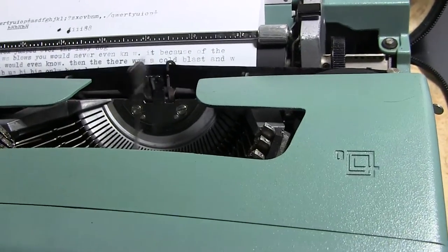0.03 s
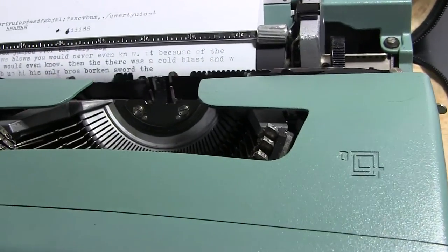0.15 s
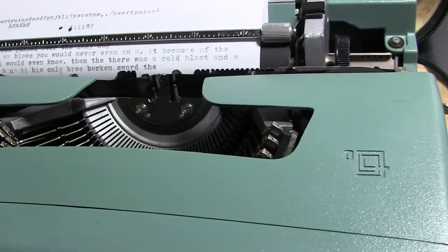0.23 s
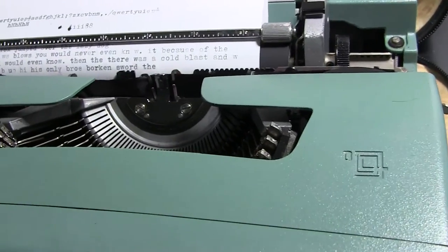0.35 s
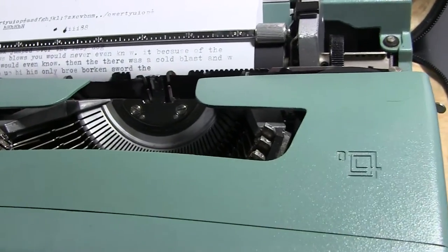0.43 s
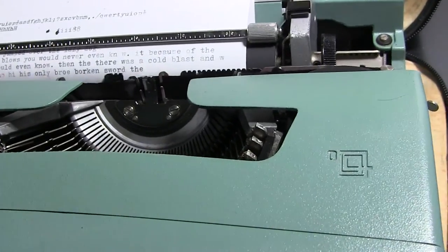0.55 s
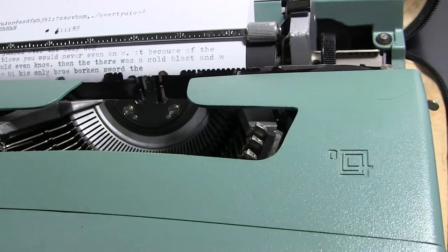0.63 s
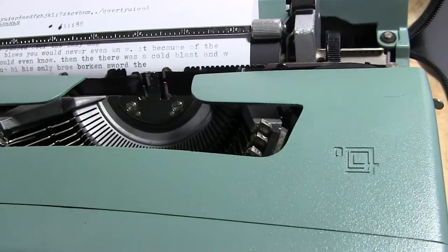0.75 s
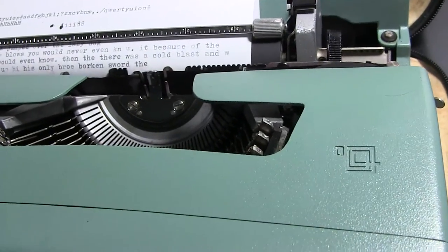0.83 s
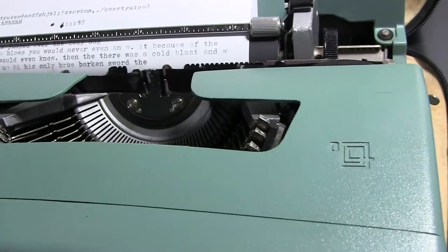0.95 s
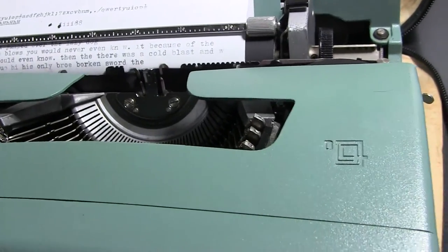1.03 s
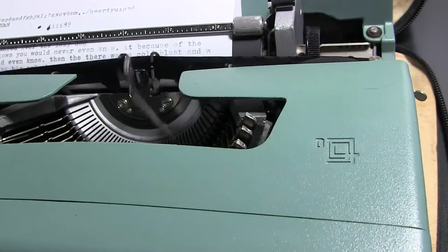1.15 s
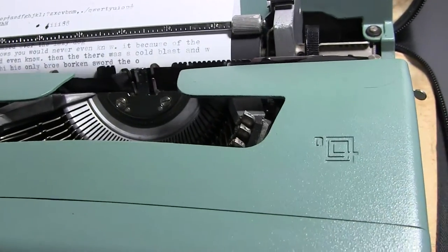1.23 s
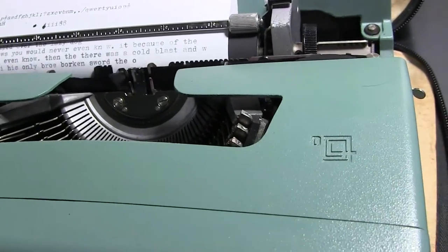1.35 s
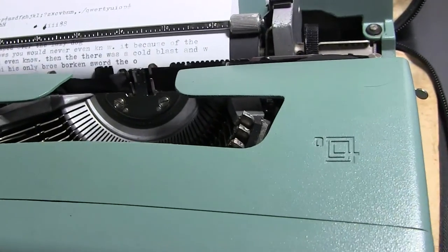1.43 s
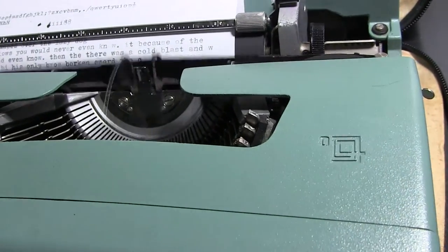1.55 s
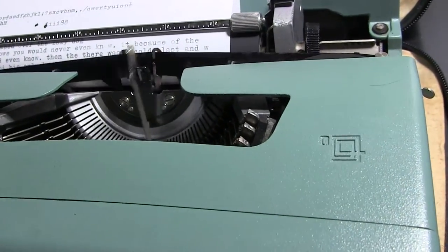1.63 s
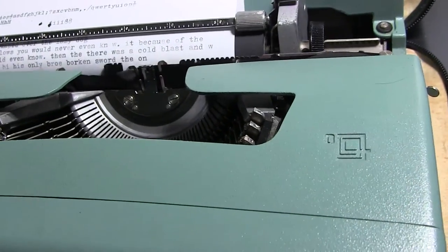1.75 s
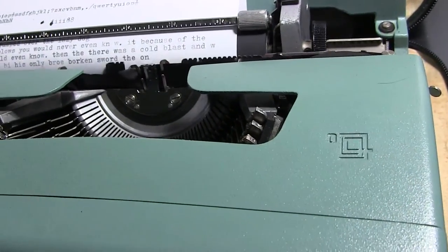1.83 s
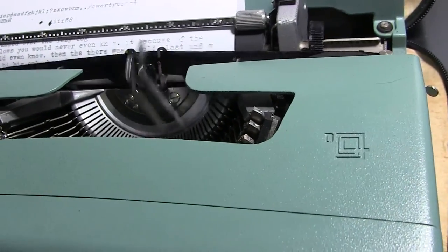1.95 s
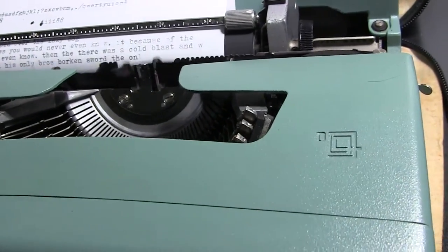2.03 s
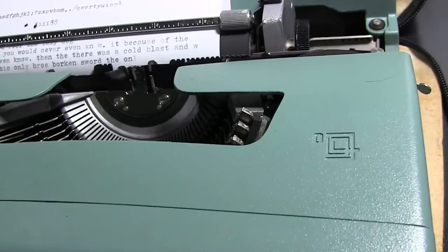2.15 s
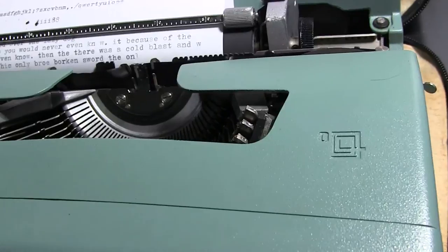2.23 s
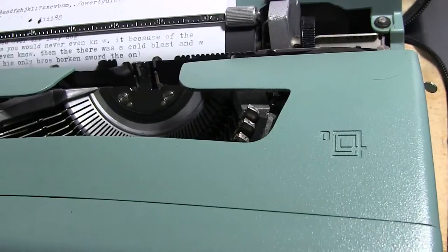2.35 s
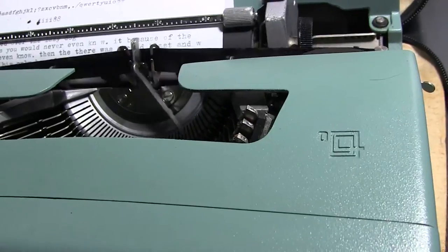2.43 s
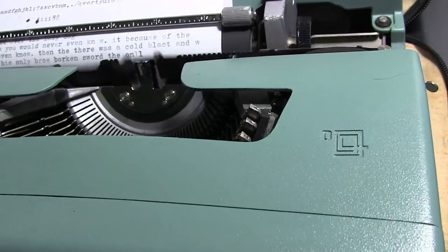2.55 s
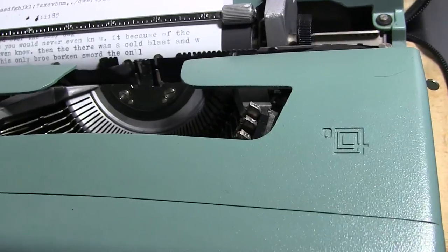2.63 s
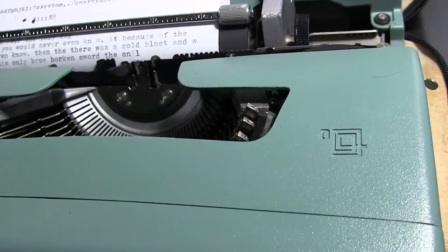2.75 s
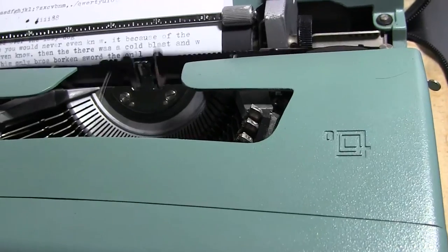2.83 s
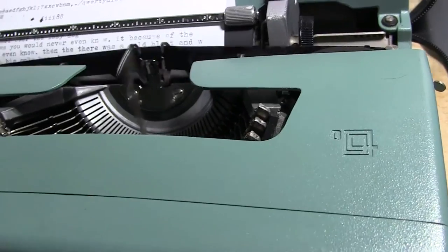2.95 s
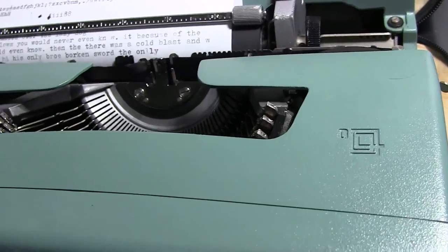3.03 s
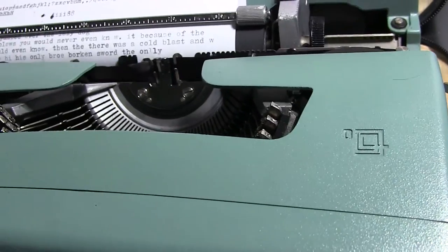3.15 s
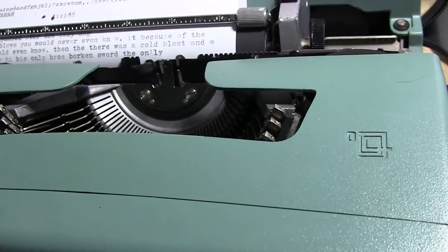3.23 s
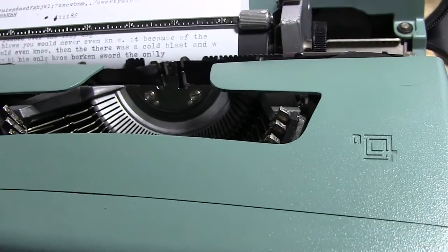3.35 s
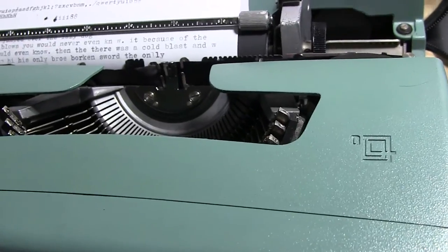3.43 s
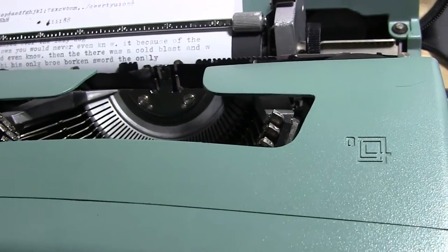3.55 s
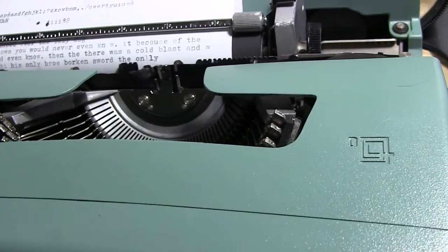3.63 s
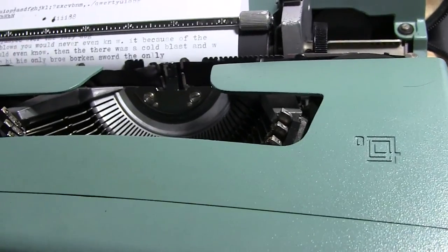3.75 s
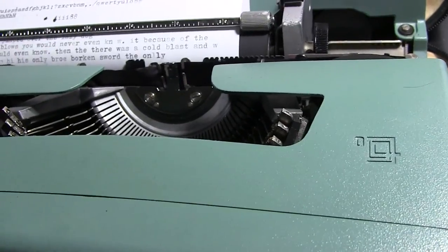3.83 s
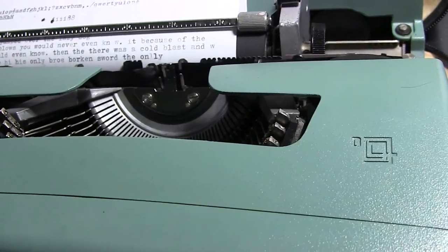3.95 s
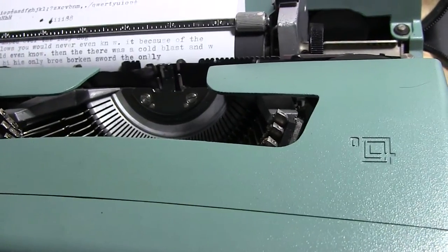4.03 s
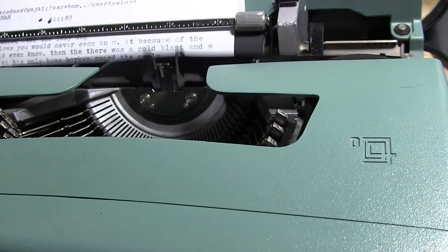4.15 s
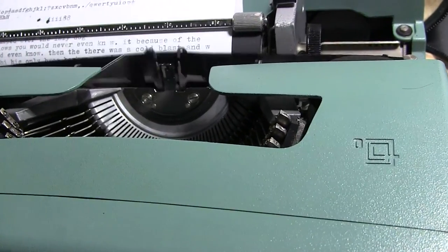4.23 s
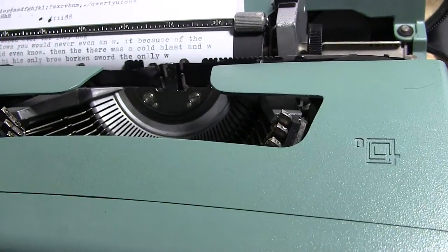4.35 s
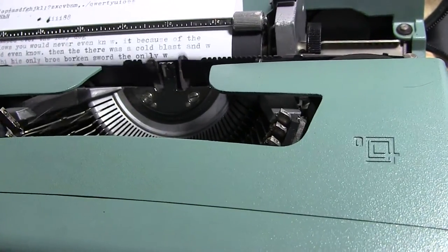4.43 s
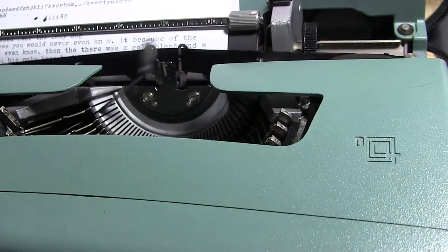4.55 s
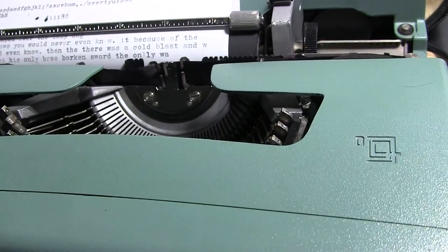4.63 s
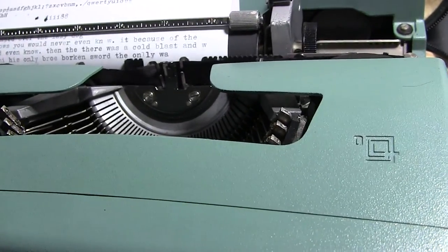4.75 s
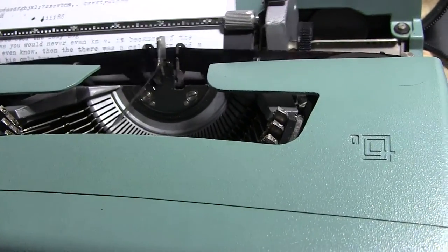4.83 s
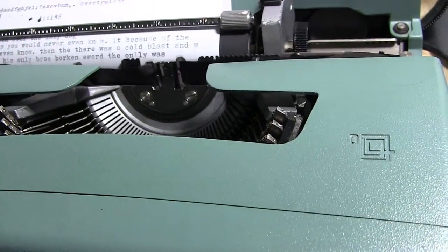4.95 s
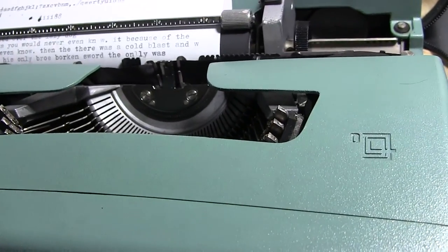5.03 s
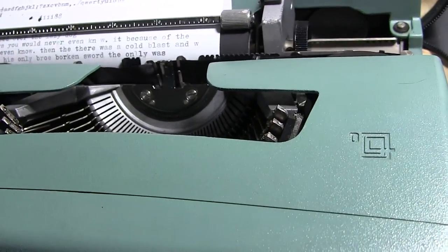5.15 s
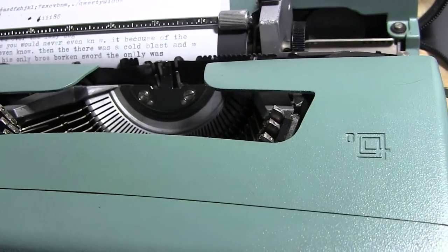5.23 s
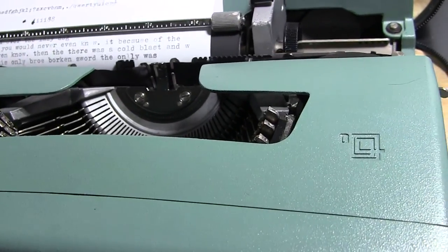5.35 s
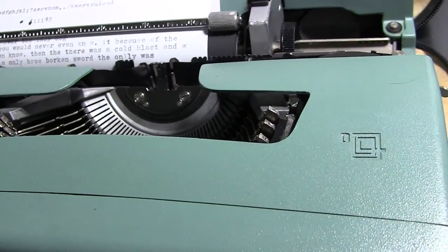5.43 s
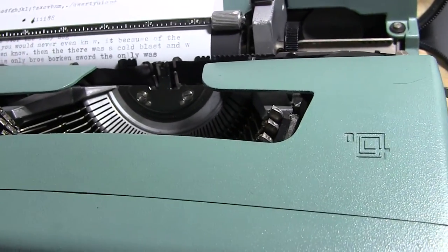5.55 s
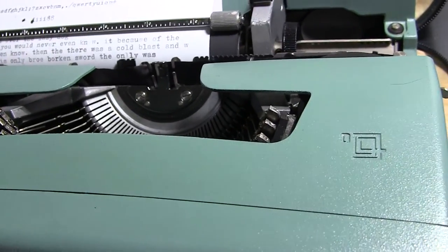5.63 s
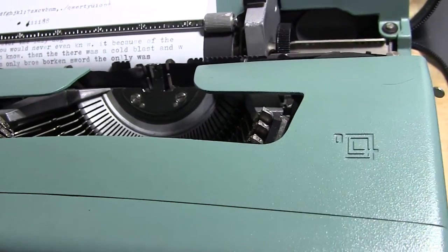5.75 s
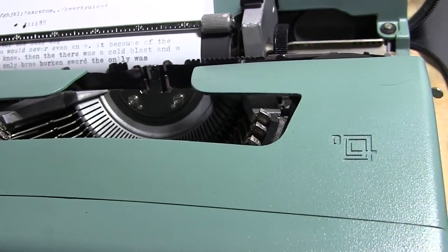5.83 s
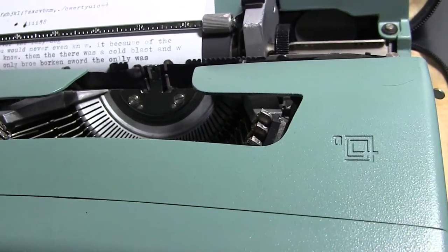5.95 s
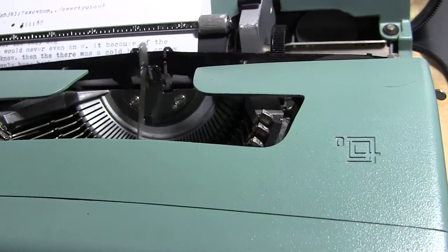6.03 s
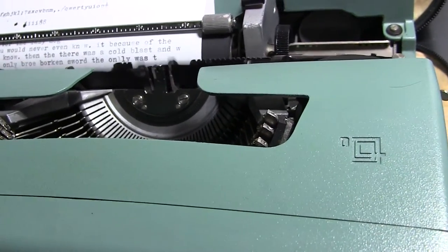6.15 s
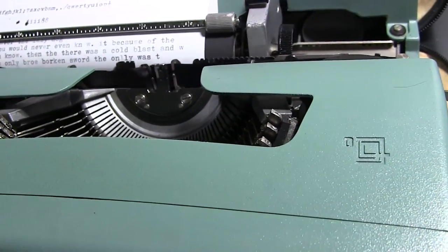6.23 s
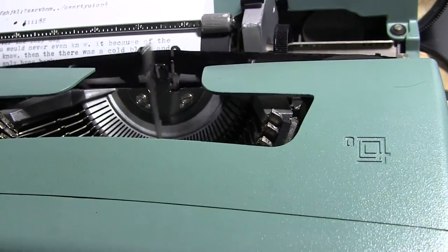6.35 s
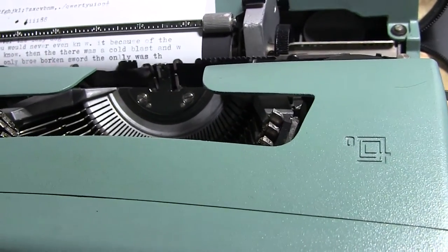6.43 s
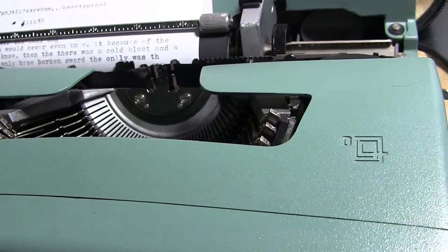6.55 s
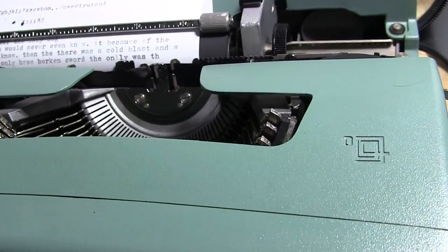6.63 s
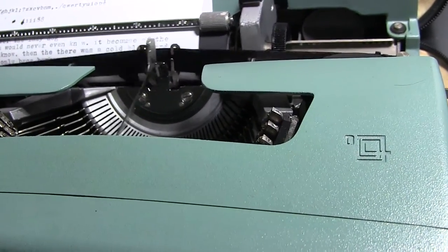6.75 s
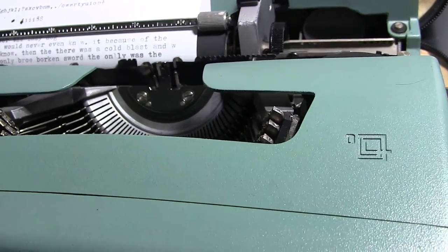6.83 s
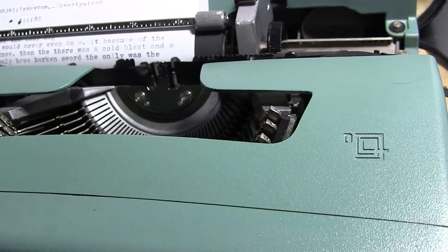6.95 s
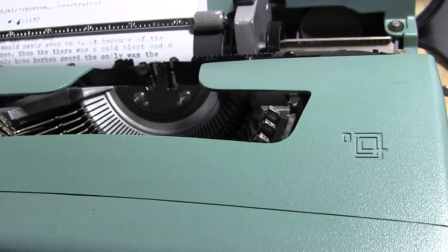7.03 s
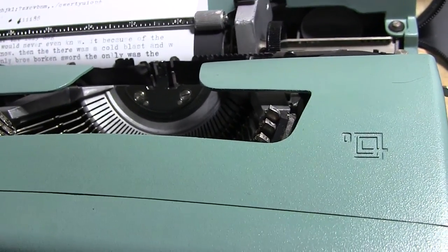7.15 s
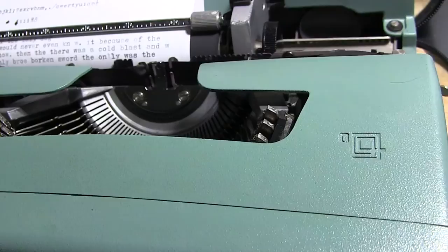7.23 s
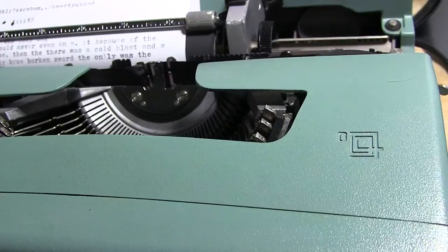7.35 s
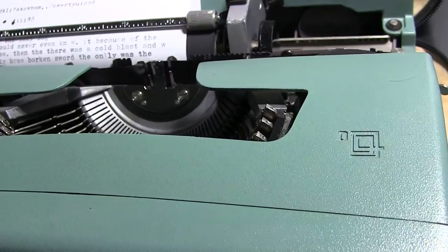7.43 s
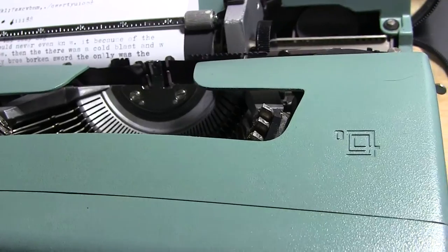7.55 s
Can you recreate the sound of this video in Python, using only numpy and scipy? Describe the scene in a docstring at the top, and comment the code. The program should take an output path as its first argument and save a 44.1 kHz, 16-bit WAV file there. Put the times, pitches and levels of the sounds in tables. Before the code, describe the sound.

Close up, a manual typewriter types a few short words in sharp metallic slaps, with carriage thuds, typebar clacks and hollow space bar knocks between.

```python
"""Manual typewriter in a small room

Close by on a desk, a few words are typed with pauses between them. Each letter is a chain of contacts: the
key takes up its linkage, the type slaps the platen, the carriage steps and stops, the typebar drops on its rest.
The space bar knocks down and rattles up. Every blow is a single push plus noisy chatter through the resonances
of the struck part, with a diffuse tail; damped modes of typebars, case and frame and spring noise ring on.
A quiet, wide room tone lies beneath."""
import sys
import numpy as np
from scipy import signal
from scipy.fft import rfft, irfft, next_fast_len
from scipy.io import wavfile

SR = 44100
rng = np.random.default_rng(int(sys.argv[2]) if len(sys.argv) > 2 else 0)


def file_out(sig):
    """Save sig as 16-bit WAV at sys.argv[1]."""
    # one column per channel
    cols = np.atleast_2d(sig).T
    # limit, then scale
    lim = np.clip(cols, -1, 1)
    pcm = np.round(lim * 32767).astype(np.int16)
    wavfile.write(sys.argv[1], SR, pcm)


N = 335160  # samples in the scene

# type slaps the platen: (time [s], level [dB], typebar ring [dB], time the finger holds the carriage back [s])
STRIKES = [(1.2248, -12.5, -53, 0), (1.7296, -12, -46, 0.002), (2.0633, -18.5, -35, 0),
           (2.5644, -12, -41.5, .038), (3.0017, -12.5, -45.5, 0.004), (4.293, -10.5, -20, 0.041),
           (4.6098, -11, -18, 0.00034), (4.956, -10, -26.5, .051), (6.1319, -11, -39, 0.0031),
           (6.4296, -12, -39, 0.0032), (6.8582, -11.3, -43, 0.0014)]
# a key takes up the slack of its linkage: (time [s], level [dB])
KEYS = [(0.064, -33.5), (.092, -38), (1.157, -43.5), (1.6794, -33.5), (1.988, -33.5), (2.037, -32.5),
        (2.5277, -26), (2.9549, -27.5), (4.258, -39.5), (4.563, -32), (4.9162, -28), (6.074, -41.5),
        (6.3869, -29), (6.811, -29.5)]
# resonances of the struck platen: (frequency [Hz], width [Hz], level [dB])
PLATEN = [(208, 71, 1.5), (333, 18, -18.5), (724, 400, -7), (1310, 860, -9), (1750, 128, -7.5),
          (2560, 560, 1.5), (3220, 260, -5), (3880, 93, -4.5), (4080, 430, -3), (5330, 110, -3.5),
          (6170, 430, -2.5), (7360, 403, -9), (8700, 450, -11.5), (10170, 480, -7.5), (11500, 2300, -13.5)]
# resonances of the key linkage: (frequency [Hz], width [Hz], level [dB])
LINKAGE = [(121, 120, -0.5), (228, 37, 1.5), (323, 37, -5), (736, 180, -9.5), (1129, 440, -6.5),
           (1488, 340, -9.5), (2370, 204, -11.5), (3525, 300, -11.5), (5594, 1038, -19), (9300, 3700, -24)]
# modes of a typebar after its slap: (frequency [Hz], level [dB], t60 [s])
TYPEBAR = [(4400, -8, .27), (5862, -14, .2), (6697, -10, .09), (8440, -15, .18), (10590, -11, .2),
           (11950, -.5, .13)]
# colour of the springs' sizzle after a slap: (frequency [Hz], relative density [dB per Hz])
SPRINGS = [(150, -16), (300, -5.5), (700, -4), (1300, 1), (2700, 0), (5000, 0.5), (7500, 1.5),
           (10000, -8.5), (12500, -13.5), (15000, -32)]
FIRM_SLAP_DB, SLAP_BRIGHTENS = -12.5, 1.6  # a firm slap; dB more treble for each dB harder
FIRM_KEY_DB, KEY_BRIGHTENS = -28, .5  # a firm press; dB more treble for each dB harder
CLASH_S, CLASH_DB = 2.0933, -20.5  # two typebars rise together once and clash at the guide


def letters(trip_db=-17, trip_ahead_s=.008, spring_db=-18.0, spring_t60=0.43):
    """Impact excitation: key click, escapement trip, slap, then free ringing; harder blows are brighter."""
    out, t = np.zeros(N), np.arange(SR) / SR
    for s, db in KEYS:
        bright_db = KEY_BRIGHTENS * (db - FIRM_KEY_DB)
        click = contact(LINKAGE, db, bass_db=-0.5, treble_db=5.5 + bright_db, chatter_t60=0.046, rise_s=0.00046,
                        slide_db=-28.5, slide_t60=.03, tail_db=-2.5, grit_db=0.8)
        add(out, s, click, LEAD)
    for s, db, ring_db, _ in STRIKES:
        trip = contact(PLATEN, db + trip_db, bass_db=0, treble_db=-1.8, chatter_t60=.05, rise_s=0.00035,
                       slide_db=-8, slide_t60=0.03, tail_db=-4.5, grit_db=5.5)
        add(out, s - trip_ahead_s, trip, LEAD)
        bright_db = SLAP_BRIGHTENS * (db - FIRM_SLAP_DB)
        slap = contact(PLATEN, db, bass_db=-8, treble_db=3.5 + bright_db, chatter_t60=.024, rise_s=.00015,
                       slide_db=-35.0, slide_t60=.02, tail_db=-13.5, grit_db=1.5)
        add(out, s, slap, LEAD)
        add(out, s, amp(ring_db) * ring(TYPEBAR))
        decay = amp(db + spring_db - 60 * t / spring_t60)
        sizzle = decay * grainy(SR, grit_db=2) * noise(SPRINGS, SR)
        add(out, s + .004, sizzle)
    clash = contact(PLATEN, CLASH_DB, bass_db=0.5, treble_db=15.0, chatter_t60=.045, rise_s=.00015,
                    slide_db=-34.5, slide_t60=.02, tail_db=-22, grit_db=7.5)
    add(out, CLASH_S, clash, LEAD)
    return out


# resonances of the stopped carriage: (frequency [Hz], width [Hz], level [dB])
CARRIAGE = [(96, 18, -5), (122, 44, 3.5), (227.5, 12, 5), (318, 45, -2.5), (446.6, 27, -4), (659, 41, -7.5),
            (787, 65, -4.5), (1118, 66, -6.5), (1420, 490, -18.5), (2600, 310, -12.5), (4100, 320, -15),
            (6500, 3200, -27.5), (9630, 3043, -43.5)]
# colour of the carriage rolling on its rail: (frequency [Hz], gain [dB])
RAIL = [(40, -34.5), (85, -5), (125, 1), (165, -9.5), (220, 0), (520, -13), (760, -1.5), (1150, -5),
        (1800, -9), (2700, -6), (6000, -13), (11000, -29), (15000, -46)]
LETTER_STEP_S = .0515  # from a slap until the carriage stops, without any holding back
LETTER_STOP_DB, SPACE_STOP_DB = -21, -21.5  # thud after a letter and after a space


def carriage(frame_db=-23, roll_db=-29, let_go_s=.035):
    """Rolling contact excites noise with the speed as envelope; the stop at the escapement is an impact."""
    out, t = np.zeros(N), np.arange(SR // 2) / SR
    steps = [(s, LETTER_STEP_S + held, LETTER_STOP_DB) for s, _, _, held in STRIKES]
    steps += [(s, wait, SPACE_STOP_DB) for s, _, wait in SPACES]
    for stroke, wait, db in steps:
        start, stop = stroke + min(let_go_s, wait), stroke + wait
        slowing = amp(-60 * np.maximum(t - (stop - start), 0) / .24)
        speed = np.clip(t / .008, 0, 1) * slowing
        bumps = grainy(len(t), 4.5) * rng.standard_normal(len(t))
        roll = filtered(bumps, lambda hz: amp(along(RAIL, hz)))
        add(out, start, amp(roll_db) * speed * roll / rms(roll))
        thud = contact(CARRIAGE, db, bass_db=-5.5, treble_db=-1.0, chatter_t60=.07, rise_s=0.0011,
                       slide_db=-11.0, slide_t60=0.22, tail_db=-9.5, grit_db=2.5)
        add(out, stop, thud, LEAD)
        add(out, stop, amp(db + frame_db) * frame_ring())
    return out


# a typebar falls on its rest: (time [s], level [dB], pitch of that bar [Hz])
RETURNS = [(1.3645, -17.5, 2455), (1.857, -15, 970), (2.181, -16.5, 2510), (2.689, -17, 1110),
           (3.129, -17, 1414), (4.412, -16.5, 1380), (4.745, -18, 2270), (5.081, -20, 2216),
           (6.287, -16, 1690), (6.5488, -16.5, 2360), (6.9801, -17, 1530)]
# a fallen typebar hops on its rest: (time [s], level [dB])
HOPS = [(1.424, -41.5), (2.242, -37.5), (2.741, -36.5), (3.163, -32.5), (6.586, -32.5)]
# resonances of the typebar rest: (frequency [Hz], width [Hz], level [dB])
BAR_REST = [(125, 23, 1.5), (236, 19, 9.5), (320, 45, 3), (418, 28, 5), (739, 110, 2), (1100, 100, 3.5),
            (1320, 140, 4.5), (1600, 359, -2.5), (2400, 1700, -2), (3930, 2700, -6.5), (6140, 2300, -6.5),
            (7905, 13000, -21), (11100, 4241, -30.5)]
HOP_HZ = 1440  # pitch of a hop


def typebar_returns(bar_width_hz=220, bar_db=6, hop_db=13, frame_db=-27):
    """Coupled resonance: each bar adds its own pitch to the rest's and shakes the frame; some hop again."""
    out = np.zeros(N)
    for s, db, bar_hz in RETURNS:
        part = [*BAR_REST, (bar_hz, bar_width_hz, bar_db)]
        clack = contact(part, db, bass_db=-0.4, treble_db=-1.83, chatter_t60=.027, rise_s=0.0013,
                        slide_db=-18.5, slide_t60=0.08, tail_db=-14.5, grit_db=1.0)
        add(out, s, clack, LEAD)
        add(out, s, amp(db + frame_db) * frame_ring())
    for s, db in HOPS:
        part = [*BAR_REST, (HOP_HZ, bar_width_hz, hop_db)]
        hop = contact(part, db, bass_db=-7.5, treble_db=-9.0, chatter_t60=.015, rise_s=.0005,
                      slide_db=-19.5, slide_t60=.02, tail_db=-16.0, grit_db=6.5)
        add(out, s, hop, LEAD)
    return out


# the space bar bottoms out: (time [s], level [dB], time until the carriage stops [s])
SPACES = [(0.1152, -17, 0.025), (3.3291, -13, 0.032), (5.403, -13.5, .029), (7.3102, -12.5, 0.034)]
# the space bar springs back against its stop: (time [s], level [dB], treble [dB], frame ring [dB])
RELEASES = [(0.2321, -17.5, -0.5, -42.5), (3.485, -20, -5, -38.5), (5.549, -20, -7, -38.5),
            (7.465, -21.5, -12, -38.5)]
# resonances of the space bar: (frequency [Hz], width [Hz], level [dB])
SPACE_BAR = [(126, 13, -16.5), (312, 21, -16), (366.5, 16.5, -10), (690, 55, -19), (1233, 180, -13.5),
             (1425, 260, -17.5), (1686, 270, -15), (2300.0, 220, -18), (3049.0, 650, -22),
             (3860, 130, -16.5), (4740, 890, -22.5), (6640, 480, -22.5), (12300, 270, -32.5)]
# resonances of its upper stop: (frequency [Hz], width [Hz], level [dB])
SPACE_STOP = [(113.2, 46, 2.5), (229.3, 26, 1), (305.4, 113, -7.5), (694, 68, 1), (830, 28, -3),
              (1120, 140, 0), (1610, 170, -8.5), (2630, 830, -9), (3840, 180, -18.5), (4780, 2000, -9.5),
              (8300, 4300, -21.5)]
# resonance of the pawl, a single row: (frequency [Hz], width [Hz], level [dB])
PAWL = (4830, 380, 2)
# modes of the hollow case under the space bar: (frequency [Hz], level [dB], t60 [s])
CASE = [(218, 0, .13), (122, -13, .13)]
PAWL_AHEAD_S, BOUNCE_S = 0.014, .02  # the pawl ticks before the bar lands; the bar bounces after


def space_bar(case_db=0.0, trip_db=-19, trip_ahead_s=.01, pawl_db=-28, bounce_db=-11):
    """Repeated impacts: trip and hollow knock going down; tick, landing, bounce and frame ring coming up."""
    out = np.zeros(N)
    for s, db, _ in SPACES:
        trip = contact([*SPACE_BAR, PAWL], db + trip_db, bass_db=-2, treble_db=-10, chatter_t60=0.045,
                       rise_s=.0005, slide_db=-9, slide_t60=.04, tail_db=-9, grit_db=3.5)
        add(out, s - trip_ahead_s, trip, LEAD)
        knock = contact(SPACE_BAR, db, bass_db=-2.2, treble_db=-0.3, chatter_t60=.028, rise_s=0.00018,
                        slide_db=-19.5, slide_t60=0.035, tail_db=-19, grit_db=3)
        add(out, s, knock, LEAD)
        add(out, s, amp(db + case_db) * ring(CASE, spread_db=-2.0))
    for s, db, treble_db, frame_db in RELEASES:
        tick = contact([*SPACE_STOP, PAWL], pawl_db, bass_db=-2, treble_db=-1.5, chatter_t60=.04,
                       rise_s=0.00045, slide_db=-1, slide_t60=0.04, tail_db=-20, grit_db=4)
        add(out, s - PAWL_AHEAD_S, tick, LEAD)
        landing = contact(SPACE_STOP, db, bass_db=2, treble_db=treble_db, chatter_t60=0.037, rise_s=0.00073,
                          slide_db=0, slide_t60=0.035, tail_db=-14, grit_db=2.0)
        add(out, s, landing, LEAD)
        bounce = contact(SPACE_STOP, db + bounce_db, bass_db=5.5, treble_db=-8, chatter_t60=.03, rise_s=.0007,
                         slide_db=-8, slide_t60=0.039, tail_db=-19, grit_db=3.5)
        add(out, s + BOUNCE_S, bounce, LEAD)
        add(out, s, amp(frame_db) * frame_ring())
    return out


# the desk top cancels two narrow bands of every knock: (frequency [Hz], gain [dB])
DESK = [(138, 1), (163, -17), (192, 0), (470, -0.5), (525, -5), (600, 1.5)]
LEAD = SR // 25  # samples before a contact
SPAN = 2 ** 13  # samples that hold one blow


def contact(part, db, bass_db, treble_db, chatter_t60, rise_s, slide_db, slide_t60, tail_db, grit_db, push_hz=520):
    """Source and filter: a slide, one push and chatter drive the part's resonances; a diffuse tail follows."""
    t, hz = (np.arange(SPAN) - LEAD) / SR, np.fft.rfftfreq(SPAN, 1 / SR) + 1
    after = np.maximum(t, 0)
    burst = amp(-60 * after / max(chatter_t60, .003)) * (1 - np.exp(-after / rise_s))
    slide = burst.max() * amp(slide_db - 60 * abs(t) / slide_t60) * (t < 0)
    rattle = (burst + slide) * grainy(SPAN, grit_db) * rng.standard_normal(SPAN)
    # the bass comes from the single push, the treble from the chatter
    slow = 1 / (1 + (hz / push_hz) ** 4)
    push = causal(np.sqrt(slow)) * rfft(t == 0)
    chatter = causal(np.sqrt(1 - slow)) * rfft(rattle / np.linalg.norm(rattle))
    power = sum(amp(level) ** 2 / (1 + ((hz ** 2 - f ** 2) / (hz * width)) ** 2) for f, width, level in part)
    band = (1 + (hz / 12500) ** 16) * (1 + (70 / hz) ** 6)  # rolls off both ends
    tone_db = along([(350, bass_db), (700, 0.015), (2200, 0), (4500, treble_db)], hz)
    tilt = amp(tone_db + along(DESK, hz))
    blow = irfft((push + chatter) * causal(np.sqrt(power / band) * tilt))
    blow *= amp(db) / rms(blow[LEAD:][:SR * 12 // 1000])  # level over the first 12 ms
    sound = amp(tail_db) * signal.fftconvolve(blow, diffuse())
    sound[:SPAN] += blow
    return sound


# long-ringing modes of frame and springs: (frequency [Hz], level [dB], t60 [s])
FRAME = [(89.8, -11.5, 1.1), (218.5, -4, .8), (323, -10.5, 1.4), (726, -1.5, 0.37), (767, -2.5, 0.49),
         (917, -5.5, 0.57), (1030, -9.5, .5), (1170, -11, .65), (1290, -8.5, 1.15), (2455, -2.5, .6),
         (2560, -1, .25)]


def frame_ring():
    """Modal decay: frame and springs vibrate freely at their own frequencies."""
    return ring(FRAME)


def ring(modes, spread_db=2):
    """Modal superposition: damped sines, at new strengths and phases for every blow."""
    t = np.arange(SR) / SR
    hz, db, t60 = np.transpose(modes)[:, :, None]
    level = amp(db + spread_db * rng.standard_normal(hz.shape) - 60 * t / t60)
    waves = np.sin(2 * np.pi * (hz * t + rng.random(hz.shape)))
    return np.sum(level * waves, 0) * (1 - np.exp(-t / .002))


GRAIN = SR // 1000  # samples that one touch of loose metal lasts


def grainy(size, grit_db):
    """Intermittent contact: loose metal touches many times, each touch with its own force."""
    touches = amp(grit_db * rng.standard_normal(size // GRAIN + 1))
    force = np.repeat(touches, GRAIN)[:size]
    return force / rms(force)


# decay of the machine's inside and the room: (frequency [Hz], t60 [s])
TAIL_T60 = [(100, .4), (300, .38), (1000, .42), (2500, .44), (5000, .42), (9000, .37), (14000, .3)]
# colour of that tail at its start: (frequency [Hz], relative level [dB])
TAIL_COLOUR = [(100, -3.5), (220, 9), (550, 2.5), (1000, 0), (2500, -6.5), (5000, -4.5), (9000, -9.5),
               (14000, -1.5)]


def diffuse():
    """Statistical reverberation: a fresh noise tail of unit energy whose top treble dies first."""
    hz, t, z = signal.stft(rng.standard_normal(SR * 3 // 4), SR, nperseg=256)
    colour_db = along(TAIL_COLOUR, hz)[:, None]
    decay_db = -60 * t / along(TAIL_T60, hz)[:, None]
    tail = signal.istft(z * amp(colour_db + decay_db), SR, nperseg=256)[1]
    tail *= 1 - np.exp(-np.arange(len(tail)) / SR / 0.0021)
    return tail / np.linalg.norm(tail)


# colour of the room's air: (frequency [Hz], relative density [dB per Hz])
ROOM_TONE = [(25, -20), (45, -14), (85, -4), (150, -9), (222, -1), (290, -9), (500, -14), (1000, -11),
             (2400, -16), (4500, -21), (8000, -29), (13000, -35), (16000, -41)]
# stereo width of the room's air: (frequency [Hz], side against mid [dB])
ROOM_WIDTH = [(60, -19.5), (150, -16.5), (400, -3), (1300, -8), (4400, -5.5), (12000, -1)]
ROOM_DB = -58  # rms of the mid


def room_tone():
    """Diffuse field: the quiet steady air has independent mid and side, wider than the machine."""
    side = filtered(noise(ROOM_TONE, N), lambda hz: amp(along(ROOM_WIDTH, hz)))
    return amp(ROOM_DB) * np.array([noise(ROOM_TONE, N), side])


def noise(spectrum, size):
    """Spectral shaping: white noise filtered to the given colour, at rms 1."""
    x = filtered(rng.standard_normal(size), lambda hz: amp(along(spectrum, hz)))
    return x / rms(x)


def amp(db):
    """Logarithmic level: decibels to gain."""
    return 10 ** (np.asarray(db) / 20)


def rms(x):
    """Effective value: the root mean square, kept above zero."""
    return np.sqrt(np.mean(x ** 2) + 1e-20)


def along(points, hz):
    """Logarithmic frequency scale: interpolates (frequency [Hz], value) points."""
    f, v = np.transpose(points)
    return np.interp(np.log(hz + 1), np.log(f + 1), v)


def filtered(x, response):
    """Linear filtering: the spectrum of x times a response of frequency."""
    n = x.shape[-1]
    m = next_fast_len(n + SPAN)
    return irfft(rfft(x, m) * response(np.fft.rfftfreq(m, 1 / SR)), m)[..., :n]


def causal(gain):
    """Minimum phase: the response with this gain that rings only after the blow."""
    cepstrum = irfft(np.log(np.maximum(gain, 1e-6)))
    cepstrum[1:SPAN // 2] *= 2
    cepstrum[SPAN // 2 + 1:] = 0
    return np.exp(rfft(cepstrum))


def add(track, s, sound, early=0):
    """Superposition: mixes a sound into the track at time s, starting some samples early."""
    start = max(round(s * SR) - early, 0)
    track[start:start + len(sound)] += sound[:max(len(track) - start, 0)]


# stereo width of the machine's reflections: (frequency [Hz], side against mid [dB])
WIDTH = [(100, -37), (300, -24), (1000, -21), (2500, -19), (5000, -16), (12000, -13)]
# balance between the sides: (frequency [Hz], left over right [dB])
LEFT = [(300, 0), (1000, 1), (8000, .9), (13000, .6)]


def scene():
    """Mid and side: a nearly centred machine whose shell reflections differ a little between the sides."""
    machine = letters() + carriage() + typebar_returns() + space_bar()
    t = np.arange(SR // 25) / SR
    shell = rng.standard_normal(len(t)) * amp(-60 * t / .08)
    echoes = signal.fftconvolve(machine, shell / np.linalg.norm(shell))[:N]
    reflected = filtered(echoes, lambda hz: amp(along(WIDTH, hz)))
    mid, side = np.array([machine, reflected]) + room_tone()
    stereo = np.array([mid + side, mid - side])
    return filtered(stereo, lambda hz: amp(np.outer([.5, -.5], along(LEFT, hz))))


TOP_HZ = 15600  # band limit


def record(dry):
    """Saturation and band limit: the hardest slaps round off near full scale, then the top is cut steeply."""
    clipped = dry / (1 + np.abs(dry) ** 6) ** (1 / 6)
    return filtered(clipped, lambda hz: 1 / (1 + (hz / TOP_HZ) ** 80))


dry = scene()
out = record(dry)
file_out(out)
```